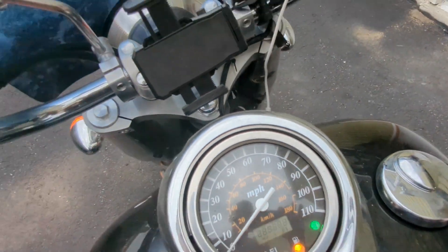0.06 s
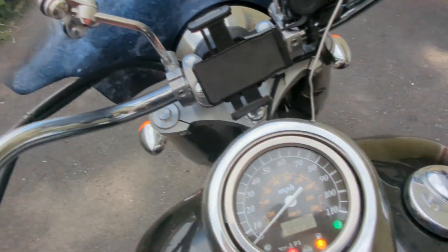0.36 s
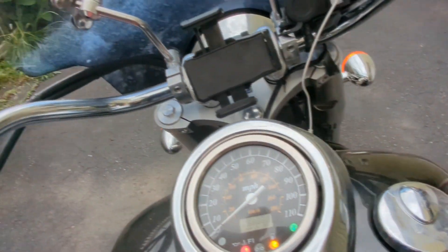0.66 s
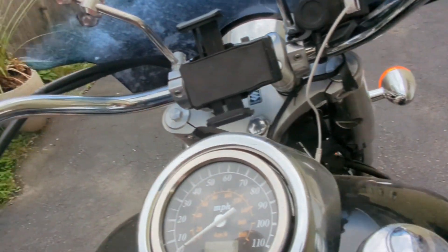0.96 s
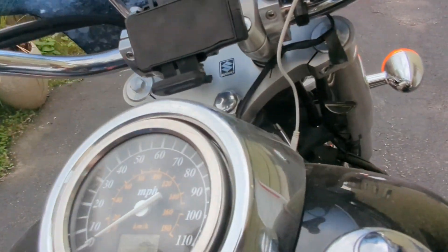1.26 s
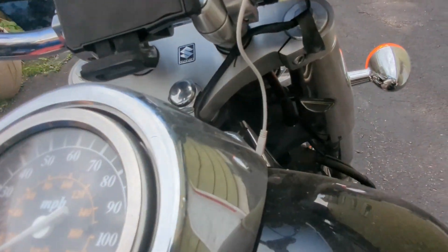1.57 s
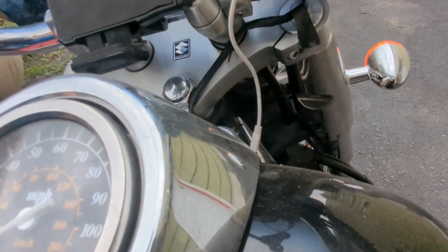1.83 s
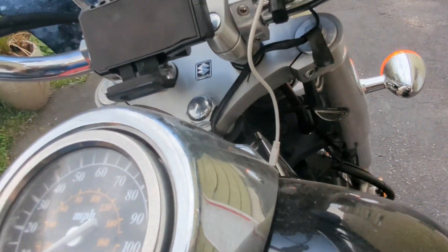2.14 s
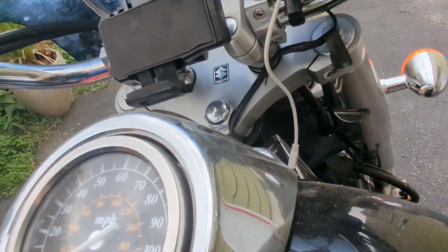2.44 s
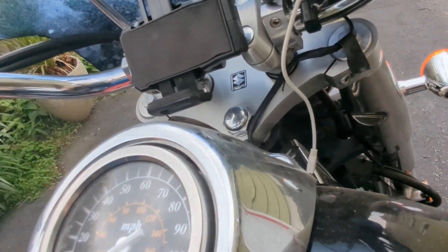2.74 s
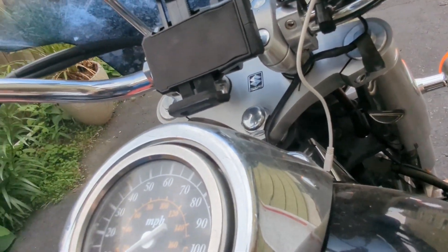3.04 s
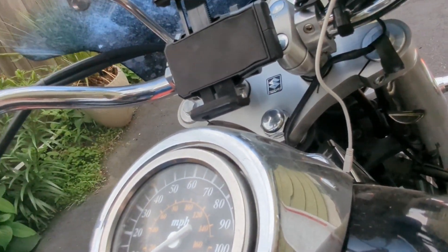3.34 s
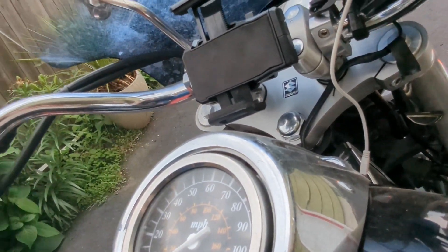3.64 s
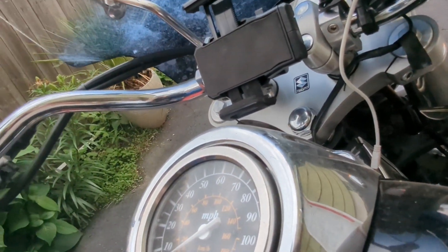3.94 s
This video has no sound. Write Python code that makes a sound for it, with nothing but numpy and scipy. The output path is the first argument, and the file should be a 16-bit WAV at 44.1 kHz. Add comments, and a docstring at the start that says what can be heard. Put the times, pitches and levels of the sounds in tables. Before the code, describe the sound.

A fuel pump whirrs and buzzes in a parked motorcycle's tank just below the microphone, gurgling for the first half second. At about 1.5 seconds it cuts out and quickly winds down. Small ticks follow, with a faint electrical whine from 2 seconds. A switch snaps sharply at about 3.5 and 3.9 seconds. Throughout, a distant engine drones, slowly rising in pitch, over soft outdoor air.

```python
"""A fuel pump whirrs in a parked motorcycle's tank, just below a stereo microphone, gurgling as it
first draws fuel. Its impeller tones, buzz and hiss follow the shaft; after a second and a half
the power cuts and it coasts to a stop. A faint electrical whine and small ticks remain, and
near the end a switch snaps twice, ringing its housing. Underneath, a distant engine drones, slowly
gaining speed, over soft outdoor air."""
import sys
import numpy as np
from scipy import signal
from scipy.fft import rfft, irfft, next_fast_len
from scipy.io import wavfile

SR = 44100
rng = np.random.default_rng(int(sys.argv[2]) if len(sys.argv) > 2 else 0)


def unload_wav(signal):
    """Save mono or channel-first audio to the path in sys.argv[1] as 16-bit WAV at rate SR, clipped to [-1, 1]."""
    wavfile.write(
        sys.argv[1],
        SR,
        np.round(np.clip(np.atleast_2d(signal).T, -1, 1) * 32767).astype(np.int16),
    )


N = 176400
T = np.arange(N) / SR
PUMP_N, PUMP_T = 2 * SR, T[:2 * SR]


def amp(db):
    return 10 ** (np.asarray(db) / 20)


def pan(left_over_right_db):
    return amp(left_over_right_db * np.array([[.5], [-.5]]))


def unit(x):
    return x / np.sqrt(np.mean(x ** 2) + 1e-20)


def curve(points, size=N):
    return np.interp(T[:size], *np.transpose(points))


def at_hz(points, hz):
    freq_hz, value = np.transpose(points)
    return np.interp(np.log(hz + 1), np.log(freq_hz + 1), value)


def add(mix, start_s, sound):
    part = mix[:, round(start_s * SR):][:, :sound.shape[1]]
    part += sound[:, :part.shape[1]]


def wander(per_s, size=N):
    """A random drift of about unit size."""
    return np.interp(T[:size] * per_s, np.arange(2000), rng.standard_normal(2000))


def fading(per_s, size, depth=.9):
    """A gain of unit power that swells gently and drops into brief deep dips."""
    drift = wander(per_s, size) + 1j * wander(per_s, size)
    return abs(1 + depth * drift) / np.sqrt(1 + 4 / 3 * depth ** 2)


def sine(turns):
    return np.sqrt(2) * np.sin((2 * np.pi * (turns % 1)).astype(np.float32))


def tone(turns, spread=0):
    """A stereo sine of unit power; spread sets how far the two phases may differ."""
    offset = rng.random() + spread * rng.uniform(-0.49, 0.26, (2, 1))
    return sine(turns + offset)


# Likeness of the microphone's two sides: freq_hz, correlation
LIKENESS = [(60, 0.96), (130, 0.62), (290, 0.93), (640, 0.16), (1400, -.1), (3000, 0), (7000, 0.09)]
def noise(spectrum, tilt_db=0, size=N):
    """Coloured stereo noise with mostly shared bass, tilted by tilt_db per octave above 500 Hz."""
    hz = np.fft.rfftfreq(size, 1 / SR)
    left, other = rfft(rng.standard_normal((2, size)))
    likeness = at_hz(LIKENESS, hz)
    right = likeness * left + np.sqrt(1 - likeness ** 2) * other
    colour = amp(at_hz(spectrum, hz) + tilt_db * np.log2(np.maximum(hz, 500) / 3000))
    return unit(irfft(np.array([left, right]) * colour, size))


# Strong tones from inside the tank: shaft_multiple, level_db, fade_db_per_s, left_over_right_db
IMPELLER_TONES = [(1, -57, -5, 1.5), (2, -52.5, 10.5, 2), (4, -63.5, -2, 0), (6, -64.5, 0.5, -2),
                  (8, -44.5, 5.5, 1.5), (16, -66.5, 1.5, -3), (29, -77.5, 0, 15.5), (40, -68, 1, 4)]
# Three singing partials, near 2.2, 4 and 4.1 kHz: time_s, level_db
SING_LOW = [(0, -56), (.19, -57), (.28, -69), (.54, -69), (.76, -59), (1.12, -58), (1.21, -67.5),
            (1.42, -58)]
SING_MID = [(0, -72), (.2, -55.5), (.46, -60.5), (.64, -57.5), (.81, -64), (.92, -57.5), (1.2, -56),
            (1.3, -61.5), (1.41, -50.5)]
SING_HIGH = [(0, -56), (.13, -70), (.28, -57.5), (.42, -67), (.7, -56), (.86, -68), (1.021, -60),
             (1.26, -67), (1.41, -55)]
SINGING = {24: SING_LOW, 44: SING_MID, 45: SING_HIGH}  # by shaft multiple
# A second family of pump tones, built on second_ratio times the shaft speed: harmonic, level_db
SECOND_FAMILY = [(4, -78), (5, -58), (7, -65.5), (8, -78), (9, -74), (12, -72)]
def impeller(turns, lag, second_ratio=1.832, stop_s=1.423, stop_db_per_s=520):
    """Wavering tones locked to the shaft, which start to die just before the motor coasts."""
    out = np.zeros((2, PUMP_N))
    for k, db, fade, pan_db in IMPELLER_TONES:
        out += amp(db - fade * PUMP_T + wander(15, PUMP_N)) * sine(k * turns - lag[k]) * pan(pan_db)
    for k, levels in SINGING.items():
        level = amp(curve(levels, PUMP_N) + wander(19.35, PUMP_N))
        out += level * sine(k * turns - lag[k]) * pan(-1.5)
    for k, db in SECOND_FAMILY:
        out += amp(db + 2.5 * wander(8.7, PUMP_N)) * tone(k * second_ratio * turns, spread=0.32)
    return out * amp(-stop_db_per_s * np.maximum(PUMP_T - stop_s, 0))


def treble_flicker(depth_db=4.5, patches=44):
    """Patches of treble flicker in level, a watery shimmer laid over the buzz."""
    return [depth_db * patch / patches * wander(14, PUMP_N) for patch in range(patches)]


# Colour of the pump's buzz: freq_hz, level_db
BUZZ_SPECTRUM = [(300, -85), (1000, -73), (2200, -83), (2800, -87), (3650, -98), (3950, -73), (4350, -65.5),
                 (5150, -65), (5400, -84), (7000, -84), (8700, -71), (10000, -80), (11400, -105),
                 (12000, -63.5), (12600, -77.5), (13700, -71.5), (14500, -79), (15100, -68.5), (16000, -74)]
# Its balance at the microphone: freq_hz, left_over_right_db
BUZZ_PAN = [(2000, 8.5), (4500, -1), (7000, 2), (15000, -1.5)]
# How fast its partials swell and fade: freq_hz, changes_per_s
BUZZ_FADE_RATE = [(4000, 6), (15000, 12)]
# Swell of the buzz between 4 and 5.4 kHz: time_s, gain_db
BUZZ_SWELL = [(0, -4.5), (.18, -2.5), (.32, 3.5), (.48, -1.5), (.65, 2), (.92, 3), (1.05, 1), (1.28, 0),
              (1.42, -3.5)]
def pump_buzz(turns, lag, shaft_hz, flicker_db, scatter_db=3):
    """The commutator buzzes on the other shaft harmonics, each heard swelling and fading."""
    out = np.zeros((2, PUMP_N))
    taken = [row[0] for row in IMPELLER_TONES] + list(SINGING)
    for k in np.setdiff1d(np.arange(3, 174), taken):
        hz = k * shaft_hz
        db = at_hz(BUZZ_SPECTRUM, hz) + scatter_db * rng.uniform(-1.4, 1, (2, 1)) + flicker_db[k // 4]
        if 4000 < hz < 5400:
            db += curve(BUZZ_SWELL, PUMP_N)
        swell = fading(at_hz(BUZZ_FADE_RATE, hz), PUMP_N)
        out += amp(db) * swell * sine(k * turns - lag[k]) * pan(at_hz(BUZZ_PAN, hz))
    return out


# Colour of the pump's hiss: freq_hz, density_db
HISS_SPECTRUM = [(200, -11.5), (550, 3.5), (1000, 0), (2100, -0.5), (2600, -9.5), (3600, -10), (4200, -3),
                 (5600, -7), (8500, -6), (11000, -32), (12000, -5.5), (15500, -7)]
def hiss(turns, throb=0.24):
    """Brushes and fuel hiss, pulsing once a turn."""
    return amp(-51) * noise(HISS_SPECTRUM, size=PUMP_N) * (1 + throb * np.cos(2 * np.pi * turns))


# Pump shaft under power: time_s, turns_per_s
SHAFT_SPEED = [(0, 91.9), (.15, 91.4), (.5, 91.1), (.75, 90.85), (1.1, 90.65), (1.44, 90.45)]
# Load on the pump, heard in its buzz and hiss: time_s, gain_db
PUMP_LOAD = [(0, 1.5), (.35, -0.5), (.8, -2), (1.3, -1), (1.43, 2)]
def fuel_pump(cut_s=1.44, coast_s=0.062, buzz_stop_db_per_s=600, hiss_stop_db_per_s=145):
    """One shaft drives tones, buzz and hiss, and coasts once the power is cut."""
    unpowered_s = np.maximum(PUMP_T - cut_s, 0)
    speed = curve(SHAFT_SPEED, PUMP_N) * np.exp(-unpowered_s / coast_s)
    turns = np.cumsum(speed) / SR + 0.00028 * wander(60, PUMP_N)
    flicker_db = treble_flicker()
    # Harmonic lags smear the brushes' rasp over 0.76 of a turn; the sides differ more in the treble.
    lag = np.cumsum(0.76 * (rng.random((175, 1, 1)) - .5), axis=0)
    apart = np.interp(np.arange(175), [8, 30, 56, 64], [.04, .5, .6, 1])[:, None, None]
    lag = lag + apart * (rng.random((175, 2, 1)) - .5)
    tones = impeller(turns, lag)
    whirr = pump_buzz(turns, lag, speed[0], flicker_db) * amp(-buzz_stop_db_per_s * unpowered_s)
    whirr += hiss(turns) * amp(-hiss_stop_db_per_s * unpowered_s)
    return np.pad(tones + whirr * amp(curve(PUMP_LOAD, PUMP_N)), ((0, 0), (0, N - PUMP_N)))


# First fuel drawn from the tank: freq_hz, density_db
GURGLE_SPECTRUM = [(300, -25), (500, -5), (650, 13), (850, -14), (1400, 2), (2100, -3), (2700, -11.5),
                   (8000, -24)]
# Its fade: time_s, level_db
GURGLE_LEVEL = [(0, -52.5), (.12, -48.5), (.25, -51), (.4, -59), (.6, -90)]
def fuel_gurgle(churn_db=2):
    """Uneven churning that fades as the fuel line fills."""
    return noise(GURGLE_SPECTRUM) * amp(curve(GURGLE_LEVEL) + churn_db * wander(70))


# Main tone of an engine far from the microphone: time_s, pitch_hz
ENGINE_PITCH = [(0, 84.2), (.45, 89.88), (1, 94.4), (1.5, 103.5), (2, 110.3), (2.5, 118), (3, 125.8),
                (3.5, 130.7), (4, 139.9)]
# That tone and a lower one: time_s, level_db
DRONE_LEVEL = [(0, -41.5), (.46, -38.5), (.56, -32), (.8, -33), (.98, -44.5), (1.03, -33.5), (1.15, -41),
               (1.23, -37), (1.31, -41.5), (1.48, -32), (1.64, -34), (1.87, -31.5), (2.05, -40.5),
               (2.38, -47.5), (2.7, -40.5), (3.4, -45.5), (3.52, -52), (3.72, -42), (4, -36.5)]
UNDERTONE_LEVEL = [(0, -49), (1.6, -60), (2.7, -51), (3.2, -40.5), (3.42, -40), (3.52, -50), (3.68, -40.5),
                   (4, -38)]
# Its weaker tones: pitch_multiple, first_db, settled_db, settle_s
ENGINE_OVERTONES = [(1.37, -51.5, -60, 0.56), (1.71, -74, -54, 2), (2, -45, -61, 0.54)]
def distant_engine(waver_db=3, flutter_db=0.12, reflection_db=-19):
    """Low tones climb together as the vehicle gathers speed; reflections reach the sides unevenly."""
    turns = np.cumsum(curve(ENGINE_PITCH)) / SR
    level = amp(curve(DRONE_LEVEL) - flutter_db * wander(25))
    direct = tone(turns)
    reflected = amp(reflection_db) * wander(3.08) * tone(turns) * [[1], [-1]]
    out = level * (direct + reflected) + amp(curve(UNDERTONE_LEVEL)) * tone(.635 * turns, spread=0.017)
    for k, first_db, settled_db, settle_s in ENGINE_OVERTONES:
        db = settled_db + (first_db - settled_db) * np.exp(-T / settle_s)
        out += amp(db + waver_db * wander(6)) * tone(k * turns, spread=0.099)
    return out


# Open air and far traffic around the parking place: freq_hz, density_db
AIR_SPECTRUM = [(200, -0.5), (300, -8), (380, -12.5), (540, -13.5), (720, -18), (1000, -17.5),
                (1900, -19.5), (2800, -31.5), (4800, -40), (7500, -46.5), (9600, -56.5), (12000, -51.5),
                (15500, -54)]
RUMBLE_SPECTRUM = [(20, -30.5), (35, -15), (50, -3), (85, 5), (120, 3.5), (180, -4.5), (260, -20),
                   (400, -21.5), (1000, -67)]
# The air at the microphone: time_s, level_db
AIR_LEVEL = [(0, -54.5), (1.7, -54), (2.15, -54), (2.6, -53), (3.1, -53), (3.45, -50.5), (4, -51.5)]
def outdoors(swell_db=1.03, rumble_db=-47):
    """Soft air slowly swells over low traffic rumble."""
    low_cut = signal.butter(4, 230, "high", fs=SR, output="sos")
    air = unit(signal.sosfilt(low_cut, noise(AIR_SPECTRUM)))
    air *= amp(curve(AIR_LEVEL) + swell_db * wander(5.03))
    return air + amp(rumble_db) * noise(RUMBLE_SPECTRUM)


# The motorcycle's electrics, faint even close by: pitch_hz, level_db
WHINE_PARTIALS = [(2619, -77.5), (5238, -79.5), (7857, -101.5), (10476, -100), (13095, -100)]
# Their rise and fall: time_s, gain_db
WHINE_GAIN = [(0, -16), (1.9, -14), (2.2, 1), (3.35, 0), (3.47, -4), (3.6, -46)]
def electrical_whine():
    """The live electrics hold one thin note."""
    return amp(curve(WHINE_GAIN)) * sum(amp(db) * tone(hz * T, spread=0.63) for hz, db in WHINE_PARTIALS)


# Ticks close by, the first as the pump cuts out: start_s, level_db, tilt_db_per_octave, t60_s
TICKS = [(1.429, -43, 5.5, 0.14), (1.508, -48.5, -4.5, 0.22), (1.7918, -54, -1.5, 0.044),
         (2.2394, -65, 2, 0.062), (2.5137, -43, -8, 0.072), (3.178, -50.5, -3.5, 0.049),
         (3.3094, -67, 9, 0.061), (3.479, -53, -6.5, 0.074)]
# Their colour: freq_hz, density_db
TICK_SPECTRUM = [(200, -13), (560, 1), (900, -6), (2200, -2), (4500, -3.5), (8000, -9.5), (15500, -10.5)]
def ticks(rise_s=0.00041):
    """Small cracks of noise that die without ringing."""
    out, t = np.zeros((2, N)), T[:SR // 3]
    for start_s, db, tilt_db, t60 in TICKS:
        envelope = (1 - np.exp(-t / rise_s)) * amp(db - 60 * t / t60)
        add(out, start_s, envelope * noise(TICK_SPECTRUM, tilt_db, len(t)))
    return out


# The rotor slowing in the tank: start_s, length_s, start_hz, end_hz, waver_hz, level_db
RUNDOWN_GLIDES = [(1.442, 0.073, 3515, 2220, 330, -53.5), (1.486, 0.091, 1984, 1726, 170, -52),
                  (1.533, .08, 518.4, 423, 127, -48)]
# Clinks from the stopping pump: start_s, pitch_hz, level_db, t60_s
CLINKS = [(1.429, 4600, -51, 0.055), (1.432, 6300, -52, .07), (1.508, 4500, -57, .12),
          (1.508, 5500, -62.5, 0.12)]
def pump_rundown(shake_per_s=600, rasp_share=.3, clink_waver_hz=91):
    """The stopping rotor gives raspy falling whistles, light clinks and a last low groan."""
    out, t = np.zeros((2, N)), T[:SR // 4]
    for start_s, length_s, start_hz, end_hz, waver_hz, db in RUNDOWN_GLIDES:
        progress = np.arange(0, 1, 1 / (length_s * SR))
        rasp = fading(start_hz * rasp_share, len(progress))
        hz = start_hz * (end_hz / start_hz) ** progress + waver_hz * wander(shake_per_s, len(progress))
        envelope = amp(db) * np.sin(np.pi * progress ** 0.42)
        add(out, start_s, envelope * rasp * tone(np.cumsum(hz) / SR, spread=0.35))
    for start_s, pitch_hz, db, t60 in CLINKS:
        hz = pitch_hz + clink_waver_hz * wander(shake_per_s, len(t))
        add(out, start_s, amp(db - 60 * t / t60) * tone(np.cumsum(hz) / SR, spread=0.64))
    return out


# Impacts of two snaps near the microphone: start_s, level_db, tilt_db_per_octave, ring_db, echo_db
SWITCH_IMPACTS = [(3.5378, -23.5, 4, -9, -22), (3.539, -16, 4.5, -7, -25), (3.541, -21.5, -8, -0.5, -16),
                  (3.8532, -27.5, -0.5, -6.5, -31), (3.8539, -17.5, -2.5, -13, -24)]
# Colour of their crack: freq_hz, density_db
SNAP_SPECTRUM = [(200, -23), (450, -12), (700, -12.5), (1100, -4), (1400, -10), (2000, 7.5), (2450, 12.5),
                 (2850, 7), (3200, 3.5), (4000, 0.5), (6000, -4.5), (8500, -2.5), (11000, -13),
                 (15500, -15)]
# Ring of the switch housing: pitch_hz, gain_db, t60_s
HOUSING_MODES = [(1330, -17.5, 0.05), (1790, -16, 0.091), (1946, -13, 0.06), (2060, -12, 0.099),
                 (2450, -17, 0.049), (2740, -12, 0.023), (3370, -11, 0.074), (3770, -18, .03),
                 (6250, -22, 0.056), (6320, -27.5, 0.19), (6700, -20, 0.031)]
def switch_snaps(rise_s=0.00066, crack_t60_s=0.017, echo_rise_s=0.0024, echo_t60_s=0.22, rattle_per_s=220):
    """Each impact cracks, leaves a brief duller echo and rings the housing, shaken by loose parts."""
    out, t = np.zeros((2, N)), T[:SR // 3]
    for start_s, db, tilt_db, ring_db, echo_db in SWITCH_IMPACTS:
        crack = noise(SNAP_SPECTRUM, tilt_db, len(t)) * amp(-60 * t / crack_t60_s)
        echo = noise(SNAP_SPECTRUM, tilt_db - 2, len(t)) * amp(echo_db - 60 * t / echo_t60_s)
        echo *= 1 - np.exp(-t / echo_rise_s)
        ring = np.zeros_like(crack)
        for hz, mode_db, t60 in HOUSING_MODES:
            mode = amp(ring_db + mode_db - 60 * t / t60) * tone(hz * t, spread=0.43)
            ring += mode * fading(rattle_per_s, len(t))
        add(out, start_s, amp(db) * (1 - np.exp(-t / rise_s)) * (crack + echo + ring))
    return out


# The motorcycle's balance from above the tank: freq_hz, left_over_right_db
TANK_BALANCE = [(200, -4), (700, 0), (1290, -4.5), (2380, 1.5), (4400, -2.5), (8120, 1.5), (15000, 1)]
def above_tank(sound):
    """Each band reaches one side of the microphone a little louder."""
    size = next_fast_len(N + SR)
    lean_db = at_hz(TANK_BALANCE, np.fft.rfftfreq(size, 1 / SR))
    return irfft(rfft(sound, size) * pan(lean_db), size)[:, :N]


def scene():
    """The motorcycle close below the microphone, with open air and an engine far behind."""
    motorcycle = fuel_pump() + fuel_gurgle() + ticks() + pump_rundown() + switch_snaps()
    return above_tank(motorcycle) + distant_engine() + outdoors() + electrical_whine()


def record(dry):
    """The recorder passes nothing much above 15.8 kHz."""
    low_pass = signal.firwin(511, 15760, window=("kaiser", 9), fs=SR)
    return signal.oaconvolve(dry, low_pass[None], "same")


dry = scene()
out = record(dry)
unload_wav(out)
```